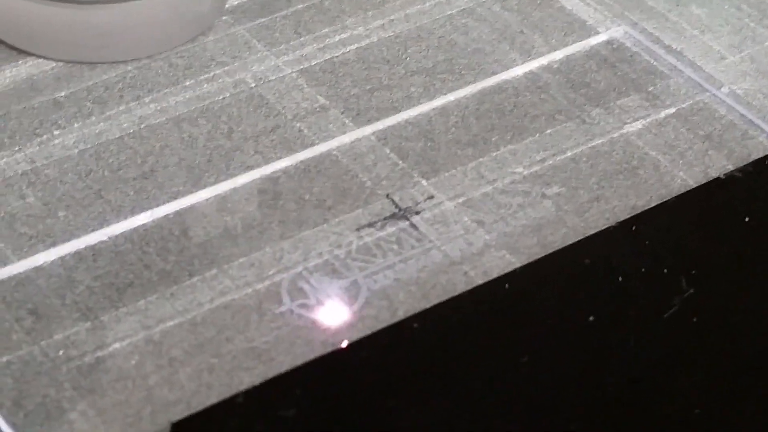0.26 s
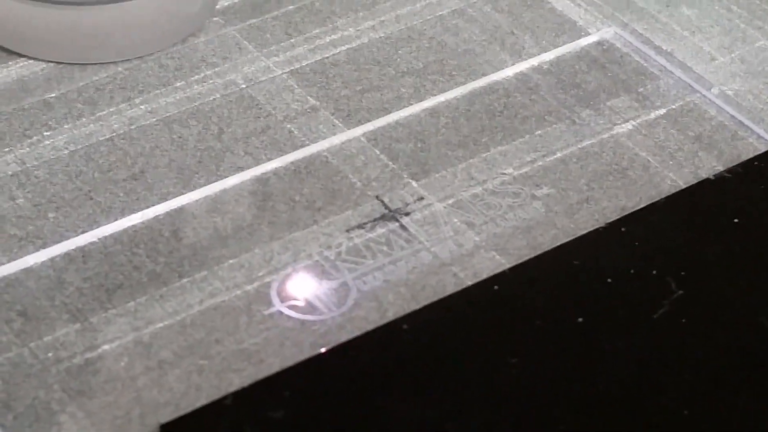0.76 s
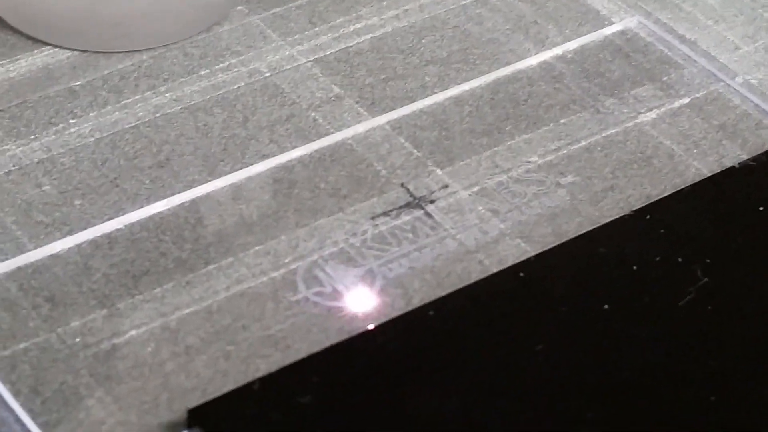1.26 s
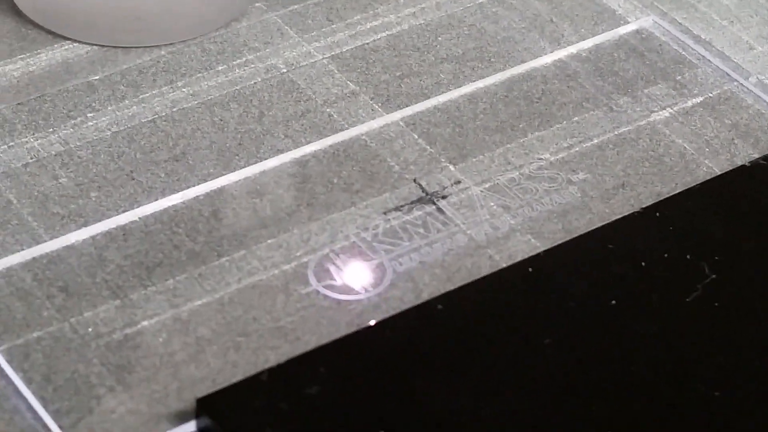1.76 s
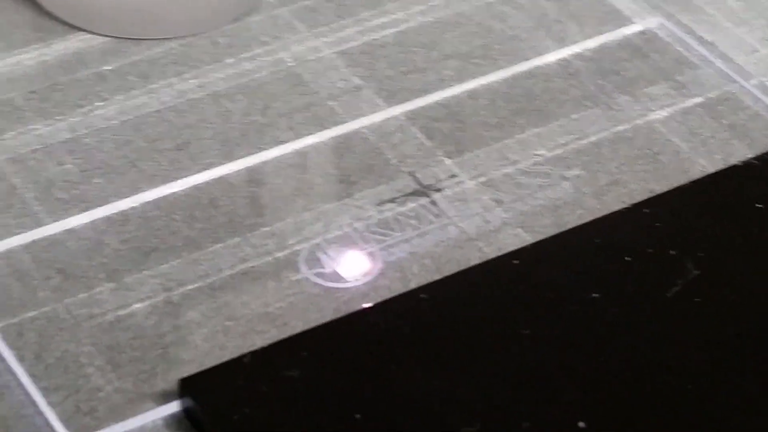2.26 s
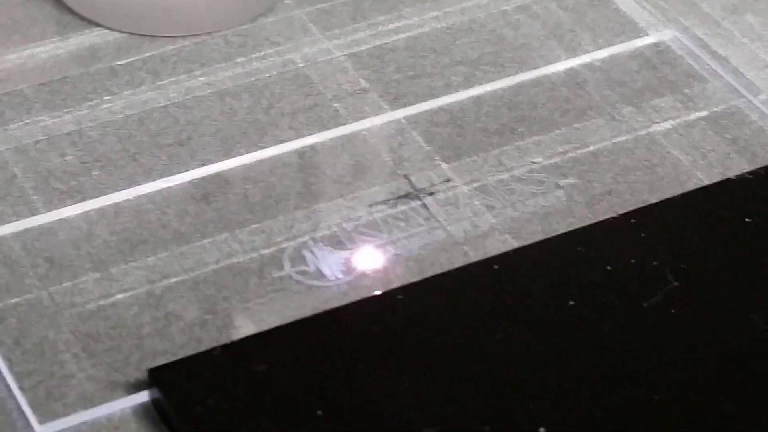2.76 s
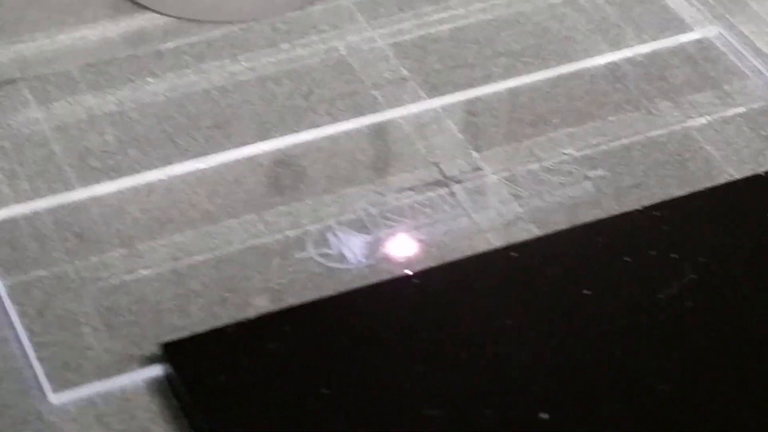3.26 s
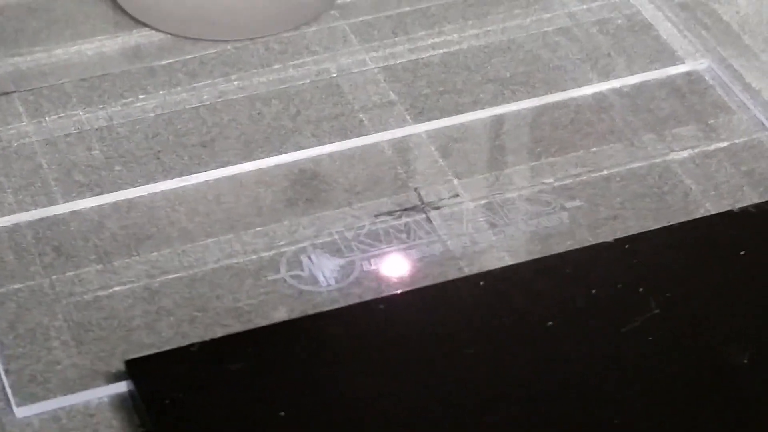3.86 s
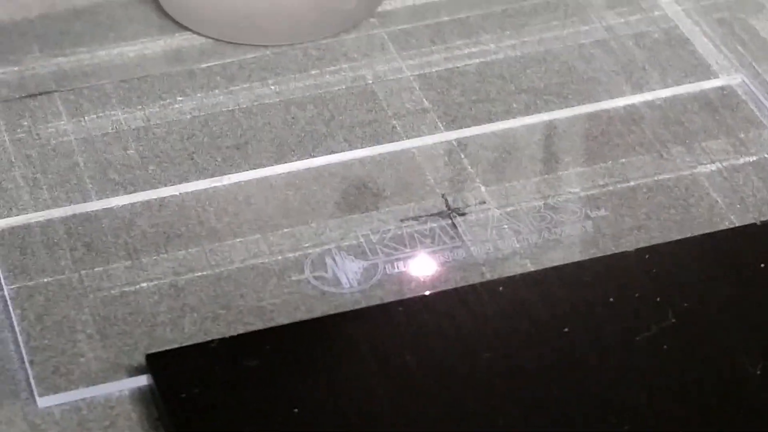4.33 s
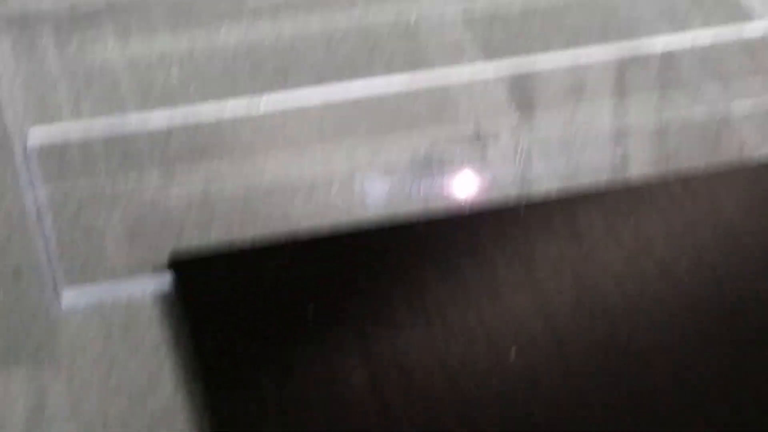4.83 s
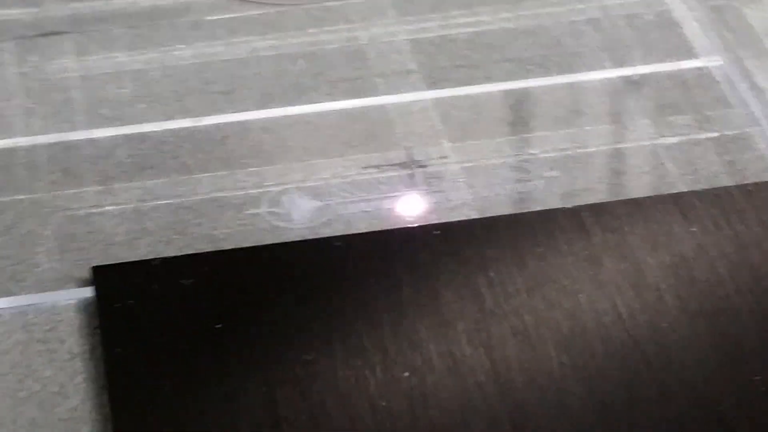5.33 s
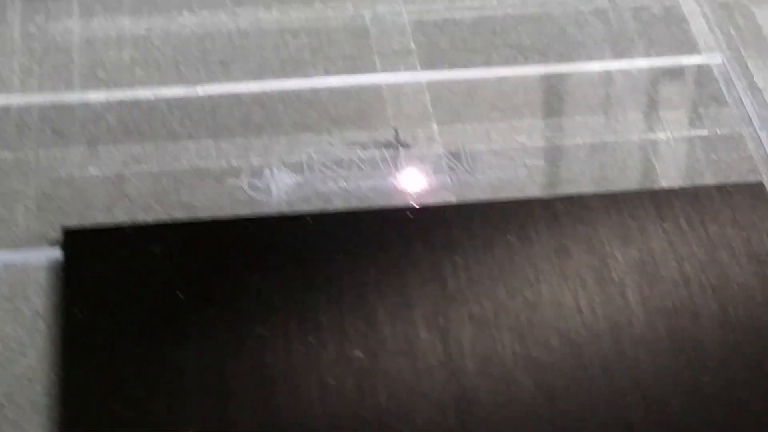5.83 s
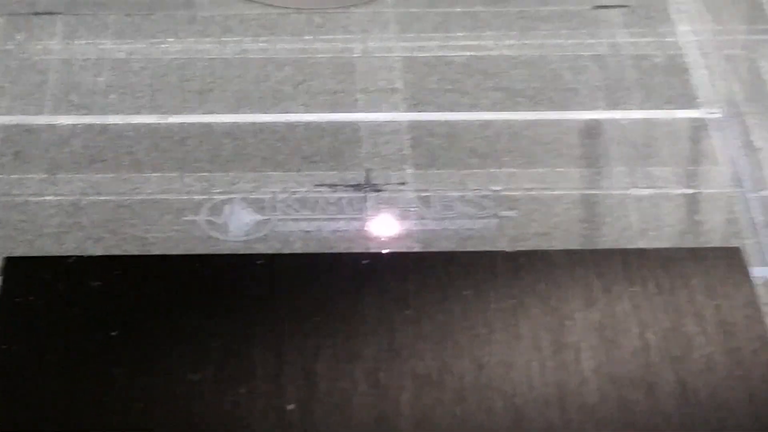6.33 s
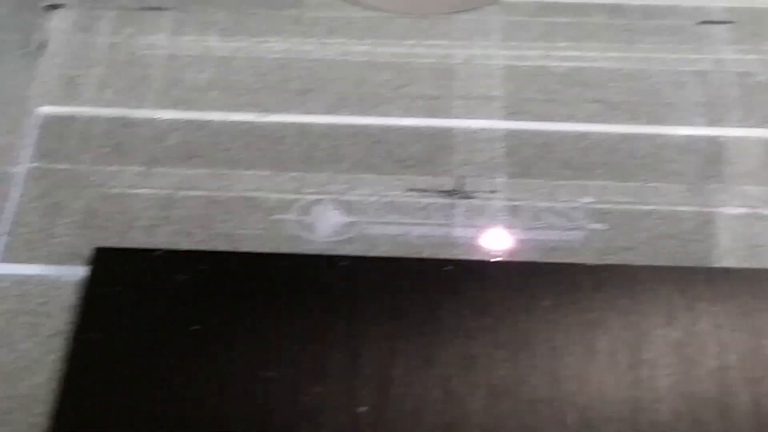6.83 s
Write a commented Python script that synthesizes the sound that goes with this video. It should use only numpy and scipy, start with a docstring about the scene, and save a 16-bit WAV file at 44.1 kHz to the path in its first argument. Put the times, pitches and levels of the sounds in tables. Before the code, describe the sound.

A laser engraving a glass slide gives a piercing, fixed-pitch whine that starts at once and never stops, swelling, fading and shifting sides as the handheld microphone moves. Fans and a pump hum low behind it. Glass chips crackle brightly between three and four seconds; a dull double tap on the left microphone comes near the end.

```python
"""Whine of a pulsed laser engraving glass: one sine at the pulse rate, swelling and fading per microphone
as a handheld camera drifts through its standing waves. Shaped noise gives the spot's sizzle; noise bursts
and noise through slide modes give the chipping glass. Fans, a pump and mains hum as noise bands and tones.
Near the end a finger bumps the left port: decaying body modes."""
import sys
import numpy as np
from scipy import signal
from scipy.fft import rfft, irfft, next_fast_len
from scipy.io import wavfile
from scipy.ndimage import map_coordinates

SR = 44100
rng = np.random.default_rng(int(sys.argv[2]) if len(sys.argv) > 2 else 0)


def log_audio(samples):
    """Write samples as a 16-bit WAV file to the path given in sys.argv[1]."""
    # one column per channel
    frames = np.atleast_2d(samples).T
    # limit to full scale, then quantise
    limited = np.clip(frames, -1, 1)
    pcm = np.round(limited * 32767).astype(np.int16)
    wavfile.write(sys.argv[1], SR, pcm)


N = 312664
T = np.arange(N) / SR

PULSE_HZ = 10830.8
# max loss behind glass dust; t60 of its clearing after a big flake
SHADE_DB, DUST_T60_S = 3.5, 0.28
# whine along the camera's drift: [t/s, base level/dB, base left minus right/dB, base left phase lead/rad]
WHINE_DRIFT = [(0.0, -22.5, -6.5, 1.93), (1.14, -23.2, -6.2, 1.64), (1.61, -21.2, -5.3, 1.1),
               (2.06, -22.2, -0.1, 0.84), (2.45, -19.4, 2.5, 0.05), (2.94, -17.9, -0.1, -1.03),
               (3.2, -19.9, -3.4, -0.81), (3.71, -16.7, -1.0, -0.58), (3.97, -18.0, -0.8, -0.1),
               (4.3, -17.4, 1.1, -0.04), (4.64, -21.4, 5.7, -0.89), (4.99, -21.0, -2.2, -0.79),
               (5.17, -24.6, 2.5, -1.2), (5.68, -20.9, -0.9, -0.63), (6.14, -18.8, 5.4, -0.91),
               (6.49, -17.9, 7.6, -1.0), (6.82, -20.3, 7.2, -1.39), (7.09, -18.0, -0.7, -2.83)]
# whine unsteadiness spectrum: [fluctuation f/Hz, rel. density/dB]
WHINE_FRAY = [(4, -9), (14, 3), (32, -2), (70, -3), (130, -10), (260, -24), (600, -18), (1500, -71)]
# stroke's swing between microphones, per second of stroke
SWING_DB_PER_S, SWING_RAD_PER_S = -7.1, 1.57


def whine(fray_db=-27.5, waver_db=0.26):
    """Fundamental of the pulse train, shaded by flying dust; uneven pulses and their echoes fray it."""
    level_db, pan_db, lead_rad = curves(WHINE_DRIFT)
    place_s, sag_db = hatching()
    _, chip_db, _ = np.transpose(CHIP_EVENTS)
    dust = strikes(chip_db - chip_db.max(), t60_s=DUST_T60_S, rise_s=0.0073)
    halves = [.5, -.5]
    pan = amp(np.outer(halves, pan_db + SWING_DB_PER_S * place_s))
    phase = np.exp(1j * np.outer(halves, lead_rad + SWING_RAD_PER_S * place_s))
    direct = amp(level_db - sag_db - SHADE_DB * dust) * pan * phase * standing_waves()
    strength = np.sqrt(np.mean(np.abs(direct) ** 2, axis=0))

    # echoes: any phase, independent per microphone
    white = rng.standard_normal((2, 2, N))
    in_phase, quadrature = unit(filtered(white, lambda hz: amp(along(WHINE_FRAY, hz))))
    frayed = amp(fray_db) * strength * (in_phase + 1j * quadrature)

    # spot bites deeper or shallower as it scans
    bite = amp(waver_db * wobble(25))
    carrier = np.exp(2j * np.pi * PULSE_HZ * T)
    return np.sqrt(2) * np.real((direct + frayed) * bite * carrier)


# spot reversals at alternate stroke ends: [t/s]
STROKE_TURNS = [0.03, 0.48, 0.94, 1.41, 1.80, 2.12, 2.33, 2.47, 2.59]
# sag at first end, at other end; Gaussian half width (1/e)
SAG_DB, OTHER_SAG_DB, SAG_S = 3.2, 1.0, 0.015


def hatching():
    """Spot's place along its stroke (s of travel) and sag (dB) of the whine at each turn."""
    ends = (-1) ** np.arange(len(STROKE_TURNS))
    place_s = np.interp(T, STROKE_TURNS, ends * np.gradient(STROKE_TURNS))
    sag_db = np.zeros(N)
    for turn_s, end in zip(STROKE_TURNS, ends):
        depth_db = SAG_DB if end > 0 else OTHER_SAG_DB
        sag_db += depth_db * np.exp(-((T - turn_s) / SAG_S) ** 2)
    return place_s, sag_db


# standing-wave nodes passed: [t/s, half width/s, gain at node/dB, microphone]
WAVE_NODES = [(3.04, 0.17, -2.9, "left"), (4.99, 0.113, -4, "left"), (5.41, 0.19, -6.1, "right"),
              (6.257, 0.117, -10.7, "right")]


def standing_waves():
    """Complex gain per microphone: at a node the tone fades and its phase slips."""
    gain = {"left": np.ones(N, complex), "right": np.ones(N, complex)}
    for node_s, width_s, depth_db, mic in WAVE_NODES:
        offset = (T - node_s) / width_s
        gain[mic] = gain[mic] * (offset + 1j * amp(depth_db)) / (offset + 1j)
    return np.array([gain["left"], gain["right"]])


# sizzle of the glowing spot: [t/s, rel. level/dB]
SIZZLE_LEVEL = [(0.0, -59), (0.26, -60), (1.07, -59.5), (1.3, -56.5), (2.67, -53.5), (3.2, -52),
                (3.67, -47.5), (4.54, -52), (5.19, -50), (7.09, -47.5)]
# sizzle spectrum: [f/Hz, rel. density/dB]
SPARK_SPECTRUM = [(7500, -37), (8800, -12.5), (9550, 1.5), (10000, -2), (10700, 9), (11700, 3.5),
                  (12500, 1), (13700, 2), (14800, 1), (15700, -32)]


def sizzle(gain_db=6.5, flicker_db=1.4):
    """Glass dust bursting from the spot: flickering noise around the whine."""
    level_db, = curves(SIZZLE_LEVEL)
    return amp(level_db + gain_db + flicker_db * wobble(40)) * noise(SPARK_SPECTRUM)


# crack spectrum: [f/Hz, rel. density/dB]
CRACK_SPECTRUM = [(7000, -38), (8800, -25), (9500, 11), (10200, 0), (11700, 8), (12800, 6), (13600, 4),
                  (14300, -3), (15500, -10)]
# splinter hiss spectrum: [f/Hz, rel. density/dB]
SPLINTER_SPECTRUM = [(1500, -10), (3000, -8.5), (4500, -4.5), (6200, -7.5), (8000, 0), (10000, -17)]
# slide modes, lowest first: [f/Hz, width/Hz, rel. level/dB]
GLASS_MODES = [(4250, 76, -41), (5820, 140, -21), (6210, 100, -12), (7430, 58, -18), (9520, 72, 9),
               (11930, 270, 15), (12800, 160, -3), (13440, 320, 9), (15700, 330, 12)]
# rasp re splinter table level; growth with flake peak
RASP_DB, RASP_DB_PER_DB = -8, 0.35


def chips(crack_db=-6, splinter_db=-13, ring_db=-12, grain_db=3, rasp_grain_db=4.0, room_db=-5):
    """Each flake cracks brightly and rings the slide; splinters hiss and rasp on its lowest modes."""
    _, peak_db, crumbs_db = np.transpose(CHIP_EVENTS)
    grain = unit(amp(grain_db * wobble(250)))
    crack = strikes(peak_db + crack_db, t60_s=0.076, rise_s=0.00078) * grain * noise(CRACK_SPECTRUM)
    splinter = strikes(crumbs_db + splinter_db, t60_s=0.25, rise_s=0.0013) * noise(SPLINTER_SPECTRUM)
    ring = strikes(peak_db + ring_db, t60_s=0.21, rise_s=0.0019) * ringing(GLASS_MODES)
    scrape_db = crumbs_db + RASP_DB + RASP_DB_PER_DB * (peak_db - peak_db.max())
    scrape = strikes(scrape_db, t60_s=0.25, rise_s=0.003)
    rasp_grain = unit(amp(rasp_grain_db * wobble(120)))
    rasp = scrape * rasp_grain * ringing(GLASS_MODES[:4])
    direct = crack + splinter + ring + rasp + knock()
    return direct + amp(room_db) * lab(direct)


# flakes: [t/s, rel. peak level/dB, rel. splinter level/dB]
CHIP_EVENTS = [(2.085, -25.5, -39.5), (2.867, -32, -54), (3.261, -22.5, -34), (3.429, -19, -35.5),
               (3.472, -24, -33.5), (3.487, -21, -37), (3.635, -20.5, -37), (3.783, -10.5, -41),
               (3.838, -11.5, -35), (3.875, -12, -35.5), (3.901, -14.5, -38), (4.248, -29, -55),
               (4.525, -28, -55), (4.814, -27.5, -60), (5.895, -31, -57), (6.547, -33, -57),
               (6.858, -33, -58)]
# peaks up to TICK_DB decay in 0.2 t60, from CRUMBLE_DB in full t60
TICK_DB, CRUMBLE_DB = -29, -23.5


def strikes(levels_db, t60_s, rise_s):
    """Chip envelope: quick opening, exponential decay, shorter for small flakes; powers add."""
    power = np.zeros(N + SR)
    t = np.arange(SR // 2) / SR
    for (start_s, peak_db, _), level_db in zip(CHIP_EVENTS, levels_db):
        life_s = t60_s * np.interp(peak_db, [TICK_DB, CRUMBLE_DB], [.2, 1])
        envelope = amp(level_db - 60 * t / life_s) * (1 - np.exp(-t / rise_s))
        power[round(start_s * SR):][:len(t)] += envelope ** 2
    return np.sqrt(power[:N])


def ringing(modes):
    """Stereo noise, rms 1, through resonant modes of the slide, alternating in sign."""
    def slide(hz):
        response = 0
        for k, (mode_hz, width_hz, db) in enumerate(modes):
            damping = 1j * hz * width_hz
            response = response + (-1) ** k * amp(db) * damping / (mode_hz ** 2 - hz * hz + damping)
        return response
    return unit(filtered(rng.standard_normal((2, N)), slide))


# slide jolts at the biggest flake: [t/s, rel. level/dB]
SLIDE_KNOCKS = [(3.781, -28)]
# knock spectrum: [f/Hz, rel. density/dB]
KNOCK_SPECTRUM = [(400, -15), (750, -5), (1150, 0.5), (1450, -4), (1850, 6), (2400, -11), (3500, -28)]


def knock(t60_s=0.17, rise_s=0.0005):
    """Slide jolting on its support: dull decaying noise."""
    envelope = 0
    for start_s, db in SLIDE_KNOCKS:
        age_s = np.maximum(T - start_s, 0)
        envelope = envelope + amp(db - 60 * age_s / t60_s) * (1 - np.exp(-age_s / rise_s))
    return envelope * noise(KNOCK_SPECTRUM)


# room decay: [f/Hz, t60/s]
LAB_DECAY = [(300, 0.19), (3000, 0.72), (9000, 0.37), (15000, 0.096)]


def lab(x):
    """Room tail: noise decaying per frequency, separate for each microphone."""
    hz, t, cells = signal.stft(rng.standard_normal((2, SR // 2)), SR, nperseg=256)
    decay = amp(-60 * t / along(LAB_DECAY, hz)[:, None])
    tail = signal.istft(cells * decay, SR, nperseg=256)[1]
    return signal.fftconvolve(x, tail / np.linalg.norm(tail[0]), axes=1)[:, :N]


# finger on left port: [t/s, rel. level/dB]
FINGER_BUMPS = [(6.8244, -7.5), (6.8295, -6)]
# camera body modes: [f/Hz, rel. level/dB, t60/s]
BODY_MODES = [(62, -16, 0.091), (170, -10, 0.038), (706, 1, 0.0061), (1120, -4.5, 0.0039)]


def bump(far_port_db=-17, soft_hz=2300):
    """Fingertip taps at the left port: decaying body modes, low-passed by the soft contact."""
    t = np.arange(SR // 10) / SR
    thud = sum(amp(db - 60 * t / t60_s) * np.sin(2 * np.pi * hz * t) for hz, db, t60_s in BODY_MODES)
    taps = np.zeros(N + SR)
    for start_s, db in FINGER_BUMPS:
        taps[round(start_s * SR):][:len(t)] += amp(db) * thud
    soft = filtered(taps[:N], lambda hz: 1 / (1 + np.square(hz / soft_hz) ** 2))
    return soft * amp([[0], [far_port_db]])


# fans at the camera: [t/s, level/dB, used re its mean]
FAN_LEVEL = [(0.0, -43.5), (0.26, -43), (0.57, -42.5), (0.97, -44.5), (1.54, -41.5), (1.87, -42.5),
             (2.84, -39.5), (3.3, -40), (3.65, -37), (4.21, -36.5), (4.56, -37.5), (4.93, -37), (5.25, -38),
             (5.57, -38.5), (6.22, -36), (7.09, -38)]
# low rumble: [t/s, rel. level/dB]
RUMBLE_LEVEL = [(0.0, -34.5), (0.08, -34), (0.75, -34.5), (0.77, -35.5), (1.7, -31.5), (1.74, -34.5),
                (2.29, -32), (4.42, -27.5), (4.44, -26.5), (4.48, -31.5), (4.82, -28), (5.84, -30),
                (6.2, -26), (6.73, -29.5), (7.01, -27), (7.09, -31)]
# air spectra, low to high band: [f/Hz, rel. density/dB]
RUMBLE_SPECTRUM = [(20, -29), (31, -18), (41, -4), (52, -5.5), (68, 3), (130, 0), (230, -4), (310, -10.5),
                   (450, -12), (650, -20.5), (1000, -54.5)]
RUSH_SPECTRUM = [(300, -22), (520, -5), (700, 0), (900, -3.5), (1250, -7.5), (1800, -7.5), (2200, -11.5),
                 (2700, -19.5), (3500, -62)]
AIR_SPECTRUM = [(2000, -9), (2900, 1), (3700, -2), (4150, -1.5), (4550, 4), (5000, -0.5), (5700, -1),
                (7000, -6.5), (8200, -10), (10000, -11), (16000, -26.5)]
# fan, pump and mains tones: [f/Hz, rel. level/dB]
HUM_TONES = [(120, -35), (171, -48), (221, -45), (263.5, -44), (358, -51.5), (376, -46.5), (404, -53.5),
             (475, -55), (577, -59.5), (686, -55), (885, -57), (1351, -60.5), (1770, -61), (1927, -66.5),
             (2023, -62)]


def machines(rumble_db=-1.0, rush_db=-44.2, air_db=-59, hum_db=-0.5, rush_grows=0.99, air_grows=1.65,
             hum_grows=0.9, drift_rad=0.33, waver_db=1.27):
    """Fan air as noise bands; blades, pump and mains as unsteady tones; up close the hiss gains most."""
    fan_db, = curves(FAN_LEVEL)
    low_db, = curves(RUMBLE_LEVEL)
    near_db = fan_db - fan_db.mean()
    rumble = amp(rumble_db + low_db) * noise(RUMBLE_SPECTRUM)
    rush = amp(rush_db + rush_grows * near_db) * noise(RUSH_SPECTRUM)
    hiss = amp(air_db + air_grows * near_db) * noise(AIR_SPECTRUM)
    hum = np.zeros((2, N))
    for hz, db in HUM_TONES:
        # port phase difference set by likeness at hz
        apart_rad = np.arccos(np.clip(along(PORT_LIKENESS, hz), -1, 1)) * np.array([[.5], [-.5]])
        level = amp(db + waver_db * wobble(4.8))
        hum += level * np.sin(2 * np.pi * hz * T + drift_rad * wobble(7) + apart_rad)
    return rumble + rush + hiss + np.sqrt(2) * amp(hum_db + hum_grows * near_db) * hum


BLADE_HZ = 1011.7
# blade tone of a small fast fan: [t/s, base level/dB]
BLADE_LEVEL = [(0, -60.5), (1.8, -60.5), (3, -56.5), (4.6, -52), (5.4, -55), (6, -67), (7.09, -57)]


def small_fan(waver_db=-0.5):
    """Blade tone of fixed pitch; its level moves as the camera passes in and out of the beam."""
    level_db, = curves(BLADE_LEVEL)
    level = amp(level_db + waver_db * np.array([wobble(5.24), wobble(5.7)]))
    return np.sqrt(2) * level * np.sin(2 * np.pi * BLADE_HZ * T)


# port likeness: [f/Hz, left-right correlation/1]
PORT_LIKENESS = [(40, 0.94), (120, 0.97), (300, 0.92), (700, 0.56), (1400, -0.26), (3000, 0.094),
                 (12000, -0.02)]
# port balance: [f/Hz, left minus right/dB]
PORT_TILT = [(40, -1.5), (120, -3), (700, -0.5), (1500, -0.5), (2400, -2.5), (3200, -0.5), (5500, -9.5),
             (8000, 0), (10000, 7.5), (14000, -1)]


def noise(spectrum):
    """Stereo noise, rms 1: bass alike at both ports, treble nearly unrelated."""
    def mid_side(hz):
        half_angle = np.arccos(np.clip(along(PORT_LIKENESS, hz), -1, 1)) / 2
        return amp(along(spectrum, hz)) * [np.cos(half_angle), np.sin(half_angle)]

    def tilt(hz):
        return amp(np.outer([.5, -.5], along(PORT_TILT, hz)))

    mid, side = filtered(rng.standard_normal((2, N)), mid_side)
    return unit(filtered(np.array([mid + side, mid - side]), tilt))


def amp(db):
    """Decibels to gain."""
    return 10 ** (np.asarray(db) / 20)


def unit(x):
    """Scale to rms 1."""
    return x / np.sqrt(np.mean(x ** 2) + 1e-20)


def along(points, hz):
    """(f/Hz, value) points interpolated on a log axis."""
    f, v = np.transpose(points)
    return np.interp(np.log(hz + 1), np.log(f + 1), v)


def curves(rows):
    """One value per sample for each column after time."""
    t, *cols = np.transpose(rows)
    return [np.interp(T, t, col) for col in cols]


def wobble(rate_hz):
    """Smooth random curve, rate_hz knots per second."""
    return map_coordinates(rng.standard_normal(int(N * rate_hz / SR) + 4), [T * rate_hz])


def filtered(x, response):
    """Multiply the spectrum of x by response(hz)."""
    size = next_fast_len(N + 8192)
    return irfft(rfft(x, size) * response(np.fft.rfftfreq(size, 1 / SR)), size)[..., :N]


def scene():
    """Laser, glass, handling and equipment at the two microphones."""
    return whine() + sizzle() + chips() + bump() + machines() + small_fan()


TOP_HZ = 15780


def record(dry):
    """Camera band limit: nothing kept from TOP_HZ up."""
    return filtered(dry, lambda hz: hz < TOP_HZ)


dry = scene()
out = record(dry)
log_audio(out)
```